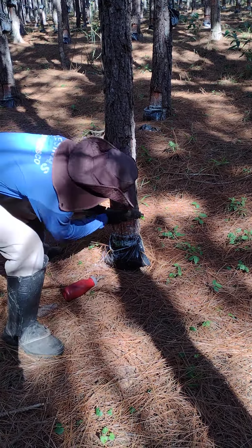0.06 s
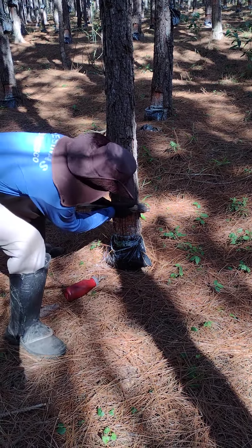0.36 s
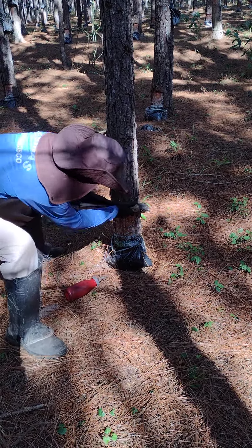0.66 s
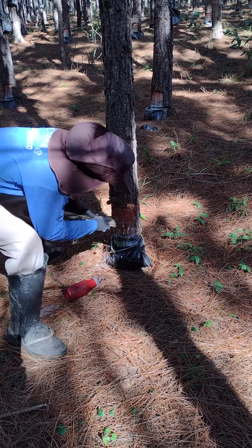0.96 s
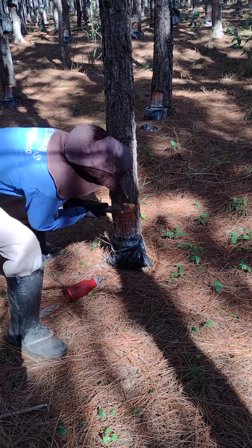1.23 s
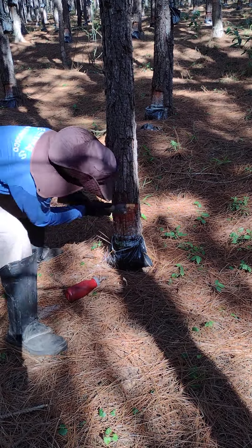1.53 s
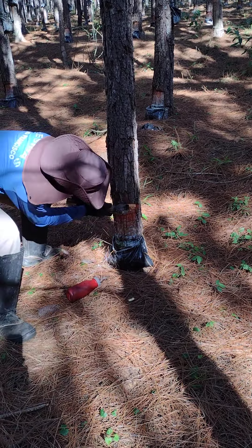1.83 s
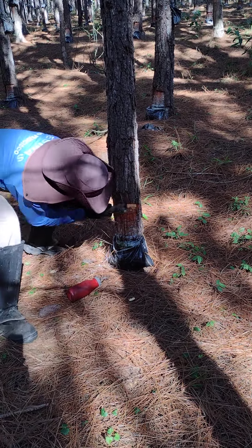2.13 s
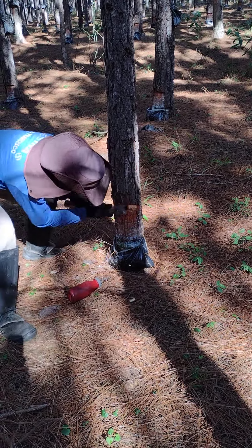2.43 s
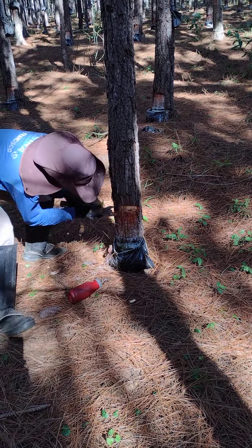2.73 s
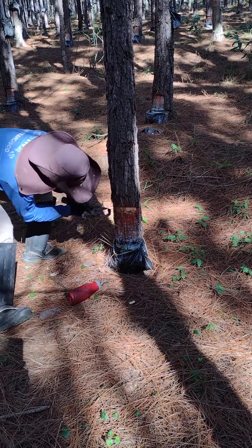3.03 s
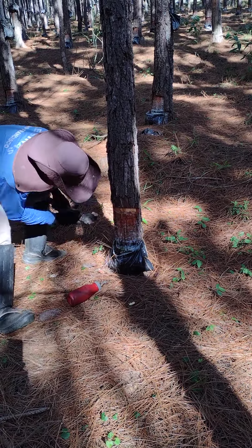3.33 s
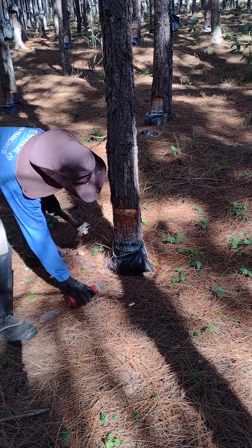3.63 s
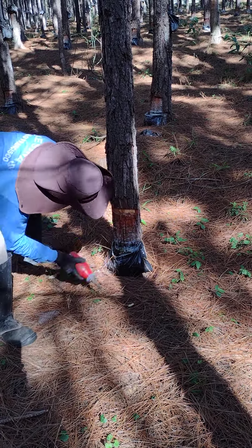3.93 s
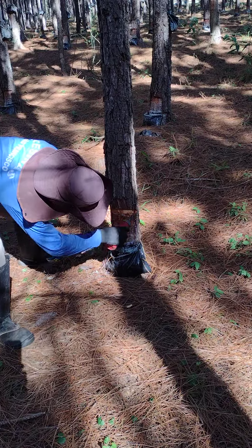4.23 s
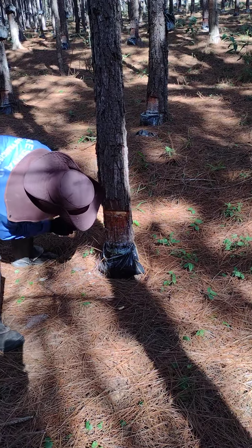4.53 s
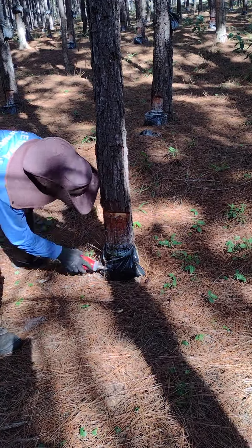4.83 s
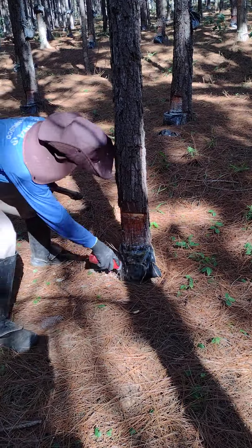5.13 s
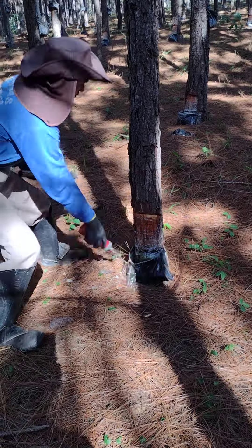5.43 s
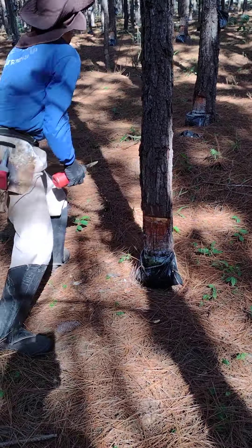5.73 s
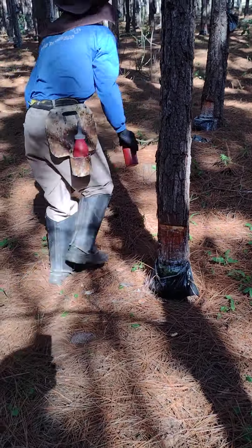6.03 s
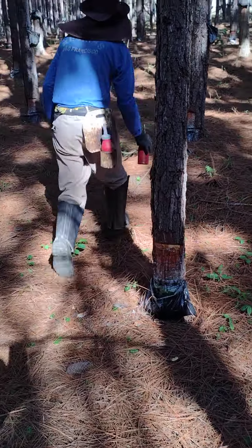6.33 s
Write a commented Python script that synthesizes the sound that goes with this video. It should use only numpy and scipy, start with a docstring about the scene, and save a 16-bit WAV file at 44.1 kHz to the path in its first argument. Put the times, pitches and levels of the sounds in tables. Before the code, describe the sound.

In a quiet pine forest, a hand blade cuts into a trunk with quick, uneven strokes, rasping through fibres, knocking lightly on the wood and snapping off crisp flakes of bark. After about three seconds the scraping stops. A plastic bottle gives a few faint dry clicks as it is handled, then hollow rubber boots walk off over softly crackling needles. The sound is close and in stereo, with slight echoes.

```python
"""A quiet pine forest, heard through a closely spaced microphone pair. A resin tapper cuts a strip of
bark with quick strokes of a hand tool: the blade knocks on the trunk, sticks and slips through the
fibres and snaps flakes loose. Then come a few dry clicks as he picks up a plastic bottle and dabs
the cut, and he walks off, dry needles crackling under his hollow rubber boots."""
import sys
import numpy as np
from scipy import signal
from scipy.fft import rfft, irfft
from scipy.io import wavfile

SR = 44100
rng = np.random.default_rng(int(sys.argv[2]) if len(sys.argv) > 2 else 0)


def store_pcm(level_fs):
    """Save levels as 16-bit WAV."""
    pcm = np.round(np.clip(level_fs, -1, 1) * 32767).astype(np.int16)
    wavfile.write(sys.argv[1], SR, np.atleast_2d(pcm).T)


N = 285396
TAPS = 4096
TIME = np.arange(N) / SR
HZ = np.fft.rfftfreq(TAPS, 1 / SR)

# Strokes of the blade. Each row: start and length of the push in seconds, swell in dB, release t60 in
# seconds, force in dB, then fine fibres and bark rasp in dB over the force.
STROKES = [ (0.041, 0.023, 9, 0.049, -52, -6.5, 3.5), (0.608, 0.016, 13, 0.11, -47, 1.5, -3.5),
           (0.808, 0.014, 22, 0.3, -41, 1, -0.5), (0.876, 0.04, 12.5, 0.074, -31, 2.5, -7),
           (1.128, .014, 28, 0.048, -39, -11.5, -17), (1.242, 0.071, 20.5, 0.12, -36, 2.5, 1.5),
           (1.586, 0.013, -4.5, 0.082, -52.5, -4.5, 13), (1.614, 0.038, 15.5, 0.55, -40.5, -2, 2),
           (1.667, 0.025, 11, 0.074, -36.5, 6, -4), (1.760, .018, 17, 0.55, -43.5, -2, 3),
           (1.821, 0.012, -4, 0.15, -35.5, -8, -7.5), (1.899, 0.017, 5, 0.061, -46, -10, 0.5),
           (1.939, 0.018, 4, 0.036, -51, 3, 1.5), (2.015, 0.055, 13, 0.06, -45.5, -2.5, 2),
           (2.220, .005, -1, 0.079, -46, -13, 0), (2.236, 0.024, 17.5, .14, -38, 1, 4),
           (2.494, 0.0093, 5, 0.092, -54, -3.5, 0), (2.545, 0.011, 4, 0.1, -56, 4.5, 5.5),
           (2.587, 0.044, 7, 0.15, -48, 6, 7), (2.811, .004, 0.5, 0.35, -54.5, -5.5, 0.5),
           (2.875, 0.013, -4, 0.13, -55.5, -1.5, 5), (2.922, 0.032, 17, 0.13, -48, 6.5, 6.5),
           (3.142, 0.078, 3, 0.23, -49, -4.5, -1.5), (3.26, 0.081, 9, 0.1, -50, 8, 6), ]
# Modes of the bark plates and of the trunk. Each row: frequency in Hz, width in Hz, level in dB.
BARK = [(644, 216, -5), (825, 141, 3), (938, 96, 0.5), (1180, 83, -5), (1597, 87, -10.5),
        (1860, 270, -22.5), (2070, 244, -7.5)]
TRUNK = [(168.7, 47, -0.5), (239, 79, 1.5), (308, 92, -2.5)]
# Spectra of breaking fibres and of dry crackle. Each row: frequency in Hz, level in dB.
FIBRES = [(100, -37), (500, -11), (1500, -15), (2700, -0.5), (3400, -13), (4000, 3.5), (5000, -7),
          (6200, -1.5), (7300, -6), (8400, 2), (9500, -3), (11300, -3), (13000, -8), (16000, -33)]
CRACKLE = [(200, -43), (1500, -4.5), (2800, -6.5), (3900, -3), (5000, -8), (6300, -2), (8400, 1),
           (9500, -1), (11300, -5), (13000, -10), (16000, -25)]


def scraping():
    """The blade sticks and slips: fibres tear, the bark plates rasp, the trunk takes the push."""
    # Spectra of coarse and of fine fibres tearing. Each row: frequency in Hz, level in dB.
    coarse_spectrum = [(100, -24), (500, -22), (1600, -8), (2700, -1.5), (3400, -5.5), (4000, 1.5),
                       (4700, -1), (5600, -29), (9000, -22.5)]
    fine_spectrum = [(500, -53), (3500, -15), (5200, -8.5), (6200, 1.5), (7300, -7), (8400, 4),
                     (9500, -3.5), (11300, -4), (13000, -15.5), (16000, -23)]
    slips = flicker(rate_hz=260, depth_db=2.9)
    rasp = amp(-2.5) * grains(per_s=3000, spread_db=1) * slips
    out, powers = np.zeros(N), np.zeros((3, N))
    for start, *drives in strokes():
        drag = drives[2] * rasp[round(start * SR):][:len(drives[2])]
        add(out, start, through(drag, ring(retuned(BARK))))  # every stroke meets another plate
        for power, drive in zip(powers, drives):
            add(power, start, drive ** 2)
    coarse, fine, pressure = np.sqrt(powers)
    out += amp(-2.5) * through(grains(5000, spread_db=-0.5) * slips * coarse, colour(coarse_spectrum))
    out += amp(-0.5) * through(grains(4300, spread_db=0) * slips * fine, colour(fine_spectrum))
    chips = grains(per_s=110, spread_db=-2) * fine
    out += amp(-9) * through(chips, unit(burst(colour(FIBRES), decay_ms=2.4, rise_ms=0.178)))
    # the heavy trunk follows the pressure less steeply than the bark does
    out += amp(-27.5) * through(grains(per_s=1500, spread_db=3) * pressure ** 0.72, ring(TRUNK))
    return out


def strokes():
    """Yields each contact of the blade: start in seconds, drive of coarse fibres, fine fibres, bark."""
    # Light slides over the bark between strokes. Each row: start and length in seconds, level in dB.
    slides = [(1.16, 0.15, -66), (1.363, 0.12, -64.5), (1.726, .06, -80), (1.843, 0.074, -56.5),
              (1.984, 0.061, -74), (2.083, 0.17, -65), (2.33, 0.12, -78.5)]
    bite_s = 0.0027  # the edge takes hold this quickly
    for start, length, swell_db, t60, db, fine_db, rasp_db in STROKES:
        grip = amp(db) * held(start)
        force = grip * push(length, swell_db, t60, bite_s)
        crumbs = grip * amp(-14.5) * push(length, swell_db, t60=0.33, attack_s=bite_s)
        tearing = np.maximum(force, crumbs)  # torn fibres trickle down after the stroke
        yield start, tearing, amp(fine_db) * tearing, amp(rasp_db) * force
    for start, length, db in slides:
        force = amp(db) * held(start) * push(length, swell_db=1, t60=0.24, attack_s=bite_s)
        yield start, force, amp(3) * force, amp(3) * force


def held(start):
    """Gain of a contact of the blade: full until the hand eases off for the next stroke."""
    lift_s, lift_db = 0.015, -7.5
    following = min([row[0] for row in STROKES if row[0] > start], default=np.inf)
    lifted = np.clip((start + TIME[:SR * 3 // 4] - following) / lift_s + 1, 0, 1)
    return amp(lift_db * lifted)


def snapping():
    """Flakes crack off: small ones sound higher, large, loud ones take longer to tear away."""
    # Flakes of bark. Each row: start in seconds, relative level in dB, pitch in Hz.
    flakes = [(0.0604, -28.5, 3600), (0.381, -40.5, 7660), (0.4756, -48, 8600), (0.6196, -37, 3900),
              (0.633, -31.5, 4300), (0.822, -31, 7900), (0.835, -30, 8400), (0.8732, -26, 8200),
              (0.883, -24, 4170), (0.907, -19, 6200), (0.9121, -16, 8200), (0.9613, -31.5, 8350),
              (1.0213, -42, 8100), (1.142, -30, 8300), (1.2167, -43, 8300), (1.2524, -29.5, 8600),
              (1.2802, -27, 6400), (1.3083, -25, 8300), (1.3309, -24, 4530), (1.685, -18, 6000),
              (1.7024, -21, 8250), (1.777, -24, 3620), (1.8263, -29, 3950), (1.9139, -32.5, 3900),
              (2.0639, -27, 4140), (2.141, -39.5, 8600), (2.2237, -39, 3900), (2.2565, -34, 4000),
              (2.262, -33, 8100), (2.279, -27, 6570), (2.4996, -45, 8450), (2.5465, -36, 8300),
              (2.6237, -14.5, 7250), (2.6395, -16, 6500), (2.8127, -43, 3900), (2.843, -40, 3770),
              (2.8787, -43, 3900), (2.945, -29, 8700), (2.9584, -21, 8800), (2.9867, -26.5, 9000),
              (3.1437, -32.5, 4000), (3.1605, -30, 3900), (3.178, -25.5, 3770), (3.1835, -26.5, 3880),
              (3.1972, -35, 4240), (3.326, -21, 7700), (3.3376, -18.5, 8300), (3.4141, -57, 5900),
              (3.4338, -48, 6300)]
    out = np.zeros(N)
    for start, db, hz in flakes:
        decay_ms = 3.32 * amp(db + 22) ** 0.22
        flake = peaked(FIBRES, hz, db=10.5, octaves=0.6)
        add(out, start, amp(db - 6.5) * burst(flake, decay_ms, rise_ms=0.12))
    return out


def knocking():
    """The blade bites: the bark rings briefly and the trunk thumps under it."""
    # Knocks of the blade. Each row: start in seconds, relative levels of bark and trunk in dB.
    knocks = [(0.824, -27, -42.5), (0.836, -26, -50), (0.872, -29, -49), (0.92, -26.5, -55),
              (1.14, -34, -77), (1.226, -35, -38.5), (1.307, -31, -65), (1.475, -43.5, -52.5),
              (1.585, -33.5, -35.5), (1.616, -36, -49), (1.691, -41, -48), (1.78, -34, -44),
              (1.833, -30.5, -41), (1.879, -51, -43.5), (1.910, -47, -40.5), (2.065, -31, -63),
              (2.222, -40.5, -54.5), (2.549, -33, -40.5), (2.879, -44, -45.5), (2.89, -34.5, -69),
              (2.957, -32.5, -45.5), (2.988, -39.5, -48.5), (3.143, -34, -58), (3.161, -30, -66),
              (3.184, -33, -74), (3.217, -46, -44.5), (3.336, -42, -44)]
    out = np.zeros(N)
    for start, bark_db, trunk_db in knocks:
        add(out, start, amp(bark_db - 3.5) * burst(ring(retuned(BARK)), decay_ms=2.8, rise_ms=0.28))
        add(out, start, amp(trunk_db + 3) * burst(ring(retuned(TRUNK)), decay_ms=4.37, rise_ms=0.64))
    return out


def ticking():
    """Tool, bottle and twigs give dry clicks, some with a short ring."""
    # Clicks. Each row: start in seconds, relative level in dB, resonance in Hz, its height in dB.
    clicks = [(1.461, -42.5, 2840, 26), (3.74, -46, 8900, 14), (4.13, -42.5, 3100, 14),
              (4.378, -47.5, 3980, 23.5), (4.594, -51.5, 1530, 10), (5.020, -35.5, 8400, 1),
              (5.041, -42, 7700, 3), (5.059, -51, 8000, 5), (5.182, -43, 8300, 4), (5.210, -39, 8500, 2),
              (5.224, -44, 4200, 15), (5.391, -37.5, 8040, 8), (5.562, -39, 8750, 8), (5.64, -50, 4384, 30),
              (5.758, -45, 4030, 13), (5.788, -39, 3070, 17)]
    out = np.zeros(N)
    for start, db, hz, ring_db in clicks:
        body = peaked(CRACKLE, hz, ring_db, octaves=0.16)
        add(out, start, amp(db - 1.5) * burst(body, decay_ms=2.67, rise_ms=0.21))
    return out


def walking():
    """Needles crackle and crush under the weight; the hollow boots flap and the heels thud."""
    # Boots flexing and landing. Each row: start in seconds, relative level of the shaft in dB,
    # its resonance in Hz, relative level of the heel in dB.
    boots = [(5.224, -48, 870, -53), (5.454, -35, 1320, -54), (5.533, -37, 750, -62),
             (5.563, -41, 724, -56), (5.679, -39.5, 785.5, -67), (5.758, -37.5, 830, -61),
             (5.791, -37.5, 1150, -71), (5.921, -46.5, 990, -66), (5.957, -43.5, 900, -54),
             (6.113, -33, 1230, -58), (6.12, -37, 1380, -54), (6.244, -38, 1400, -79),
             (6.303, -49, 1000, -78), (6.305, -33.5, 1260, -74), (6.367, -49, 719, -46.5)]
    # Spectra of a boot shaft and of crushed litter. Each row: frequency in Hz, level in dB.
    shaft_spectrum = [(150, -16), (450, -13.5), (750, -1.5), (1000, -8), (1300, -6), (1700, -23), (2170, 0),
                      (2700, -18), (4000, -16), (6000, -37)]
    litter_spectrum = [(80, -11), (200, -8.5), (450, -7.5), (750, 3.5), (1000, -8), (1300, -1.5),
                       (1700, -19), (2200, -4.5), (3000, -12), (8000, -31)]
    soil = colour([(40, -22), (110, -5), (190, -4.5), (330, -7.5), (600, -11.5), (2000, -26)])
    crackle, litter, weight = treading()
    clumps = flicker(rate_hz=94, depth_db=1)
    needles = grains(per_s=4500, spread_db=3.2) * clumps * crackle
    out = amp(-1.77) * through(needles, colour(CRACKLE))
    crushing = grains(per_s=2500, spread_db=3) * clumps * litter
    out += amp(-1) * through(crushing, colour(litter_spectrum))
    stiff_needles = grains(per_s=60, spread_db=0.6) * crackle
    out += amp(-5) * through(stiff_needles, unit(burst(colour(CRACKLE), decay_ms=5, rise_ms=0.2)))
    out += amp(1) * through(rng.standard_normal(N) * weight, soil)
    for start, db, hz, heel_db in boots:
        shaft = peaked(shaft_spectrum, hz, db=12.5, octaves=0.24)
        add(out, start, amp(db - 4.5) * burst(shaft, decay_ms=6.1, rise_ms=0.64))
        add(out, start, amp(heel_db + 2) * burst(soil, decay_ms=6.6, rise_ms=0.87))
    return out


def treading():
    """How hard the needles, the litter under them and the soil are pressed over time."""
    # A hand or foot on the needles. Each row: start and length in seconds, swell in dB, release t60
    # in seconds, crackle in dB, then litter and weight in dB over the crackle.
    rustles = [ (3.408, 0.022, 15, 0.21, -63, 3, -10), (3.668, 0.016, 1, 0.74, -64, -3, -3),
               (3.840, 0.12, -1.5, .30, -68.5, -19, -8), (4.122, .008, 9, 0.22, -66, 5.5, 0),
               (4.570, 0.039, 1, 0.23, -71.5, 6.5, -14), (4.815, 0.025, 6, 0.83, -65.5, -1.5, -6),
               (4.924, 0.048, 9, 0.61, -47, -12, -21.5), (5.170, 0.066, 5, 0.76, -58.5, -3.5, -10),
               (5.330, 0.16, 13, 0.48, -47, -4.5, -16), (5.690, 0.06, 8, 0.61, -58.5, 2, -15),
               (5.943, 0.038, 5, 0.39, -54, -8, -17), (6.114, 0.0098, 7, 0.33, -65.5, 5.5, -1),
               (6.170, 0.074, 20, 0.35, -58, -2.5, -21), (6.294, 0.038, 1.5, 0.67, -49, -4.5, -15.5), ]
    powers = np.zeros((3, N))
    powers[0] = amp(-79.5) ** 2  # the crouching man keeps the needles faintly astir
    for start, length, swell_db, t60, db, litter_db, weight_db in rustles:
        press = amp(db) * push(length, swell_db, t60, attack_s=0.0071)
        for power, share in zip(powers, amp([0, litter_db, weight_db])):
            add(power, start, (share * press) ** 2)
    return np.sqrt(powers)


def scatter(x, t60, db):
    """Sound thrown back by ground and trunks: sparse echoes that die away."""
    t = TIME[:SR // 2]
    echoes = rng.standard_normal(len(t)) * (rng.random(len(t)) < 2500 / SR) * (t > 0.002)
    return amp(db) * through(x, unit(echoes * amp(-60 * t / t60)))


def forest():
    """The bed under it all: faint, slightly restless air among the pines."""
    # Spectrum of the air. Each row: frequency in Hz, level in dB.
    air_spectrum = [(15, -49.5), (25, -13.5), (127, -0.5), (190, -6.5), (335, -4.5), (503, -4.5),
                    (607, -2.5), (2160, -16.5), (2350, -14), (3920, -18.5), (5000, -25.5), (6050, -17.5),
                    (7310, -33.5), (8830, -21.5), (16000, -27.5)]
    air = rng.standard_normal(N) * flicker(rate_hz=78, depth_db=4)
    return amp(-67.5) * through(air, colour(air_spectrum))


def push(length, swell_db, t60, attack_s):
    """Gain of one push: it takes hold, moves by swell_db to 1 over its length, then dies away."""
    t = TIME[:SR * 3 // 4]
    db = np.where(t < length, swell_db * (t / length - 1), -60 * (t - length) / t60)
    return np.minimum(t / attack_s, 1) * amp(db)


def grains(per_s, spread_db):
    """Tiny fractures of random size at random moments, rms 1."""
    size = amp(spread_db * np.minimum(rng.exponential(1, N), 4))
    return evened(size * rng.choice([-1., 1.], N) * (rng.random(N) < per_s / SR))


def burst(response, decay_ms, rise_ms):
    """A quick run of fractures into a body with this impulse response."""
    ms = TIME[:TAPS] * 1000
    shape = np.exp(-ms / max(decay_ms, 0.1)) * (1 - np.exp(-ms / rise_ms))
    return unit(through(shape * rng.standard_normal(TAPS), response)) * np.linalg.norm(shape)


def ring(modes):
    """Impulse response of damped modes, energy 1; neighbours swing in opposite directions."""
    t = TIME[:TAPS]
    return unit(sum((-1) ** k * amp(db) * width * np.exp(-np.pi * width * t) * np.sin(2 * np.pi * hz * t)
                    for k, (hz, width, db) in enumerate(modes)))


def retuned(modes):
    """The same modes, all a little higher or lower, as another spot is hit."""
    return np.array(modes) * [rng.uniform(0.93, 1.07), 1, 1]


def flicker(rate_hz, depth_db):
    """A random gain of mean power 1."""
    return evened(amp(depth_db * wander(rate_hz)))


def wander(rate_hz):
    """Smooth noise of rms 1 that rolls off above rate_hz."""
    rolloff = 1 + (np.fft.rfftfreq(N, 1 / SR) / rate_hz) ** 4
    return evened(irfft(rfft(rng.standard_normal(N)) / rolloff, N))


def colour(points):
    """Impulse response of a spectrum, energy 1."""
    return unit(causal(read(points)))


def peaked(points, hz, db, octaves):
    """Impulse response of a spectrum with one resonance standing out of it, energy 1."""
    resonance = db * np.exp(-(np.log2((HZ + 1) / hz) / octaves) ** 2)
    return unit(causal(read(points) + resonance))


def causal(db):
    """The quickest (minimum-phase) impulse response that has this gain."""
    log_gain = np.log(amp(np.r_[db, db[-2:0:-1]]))
    return np.fft.ifft(np.exp(np.conj(signal.hilbert(log_gain)))).real[:TAPS // 2]


def read(points):
    """Pairs of Hz and value joined on a log-frequency axis."""
    hz, value = np.transpose(points)
    return np.interp(np.log(HZ + 1), np.log(hz), value)


def add(mix, start, sound):
    """Lays a sound into the mix at start seconds."""
    part = mix[max(round(start * SR), 0):][:len(sound)]
    part += sound[:len(part)]


def through(x, response):
    return signal.oaconvolve(x, response)[:len(x)]


def amp(db):
    return 10 ** (np.asarray(db) / 20)


def evened(x):
    return x / np.sqrt(np.mean(x ** 2) + 1e-20)


def unit(x):
    return x / np.sqrt(np.sum(x ** 2) + 1e-20)


def scene():
    """The tapper at work, with echoes off the ground nearby and the trunks farther out."""
    work = scraping() + snapping() + knocking() + ticking() + walking()
    ground = scatter(work, t60=0.03, db=-15)
    trunks = scatter(work, t60=0.33, db=-24)
    sound = work + ground + trunks + forest()
    return np.array([sound, sound])


def record(dry):
    """The close pair: each channel subtracts a slightly delayed copy, which cuts a comb of notches."""
    # Cancellation. Each row: frequency in Hz, share of the delayed copy taken off (capped below).
    cancel = [(600, -0.11), (1500, 0.61), (2400, 0.78), (7500, 0.62), (10200, 2), (12000, 0.46),
              (16000, 0.7)]
    # Balance of the pair. Each row: frequency in Hz, left minus right in dB.
    lean = [(100, -3.5), (800, -3), (1300, -2), (1800, 4), (2250, 3), (2650, -1.5), (4000, -2),
            (5500, -3.5), (8000, -6), (9500, -2), (11500, -1), (15000, -6)]
    # Spacing of the notches in Hz, left then right.
    notch_spacings = [2560, 2365]
    low_cut_hz, high_cut_hz = 66, 15950
    oblique = causal(read([(200, -23), (900, -33), (1900, -17), (4000, -19), (8000, -7),
                           (11000, -9.5), (15000, -11)]))
    out = []
    for x, notch_hz, side in zip(dry, notch_spacings, (1, -1)):
        comb = 1 - np.clip(read(cancel), 0, 0.95) * np.exp(-2j * np.pi * HZ / notch_hz)
        microphone = causal(20 * np.log10(abs(comb)) + side * read(lean) / 2 - 1)
        # grains come from slightly different directions, so the channels never quite agree
        out.append(through(x, microphone) + through(x, oblique) * wander(rate_hz=52))
    out = signal.sosfilt(signal.butter(2, low_cut_hz, "highpass", fs=SR, output="sos"), out)
    high_cut = signal.firwin(511, high_cut_hz, window=("kaiser", 8), fs=SR)
    return signal.oaconvolve(out, high_cut[None], "same", axes=1)


dry = scene()
out = record(dry)
store_pcm(out)
```